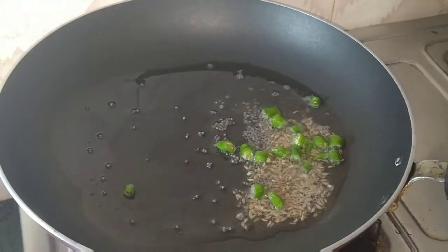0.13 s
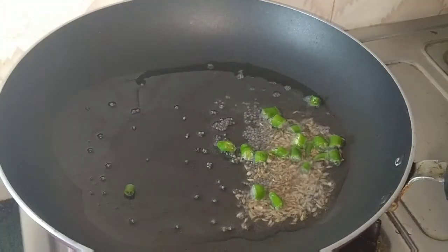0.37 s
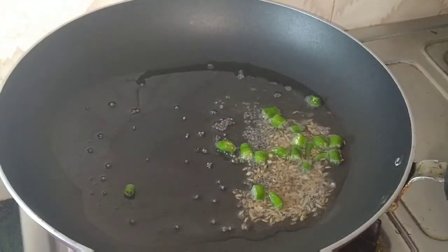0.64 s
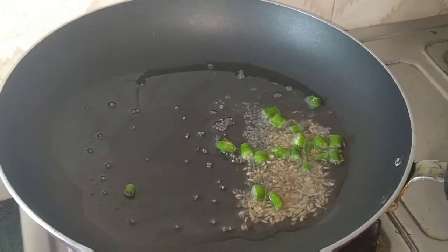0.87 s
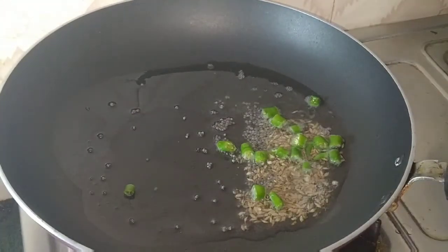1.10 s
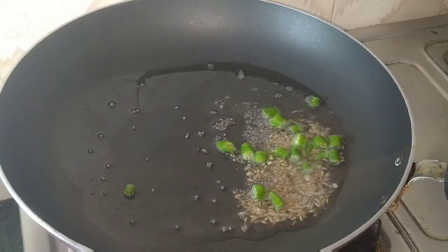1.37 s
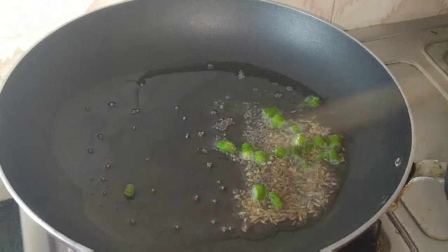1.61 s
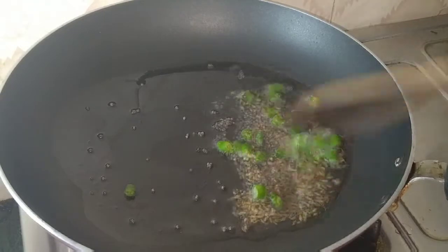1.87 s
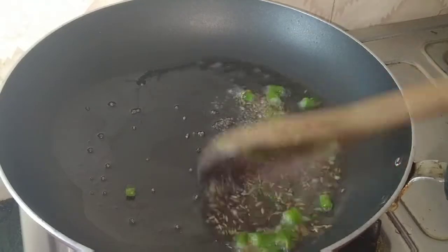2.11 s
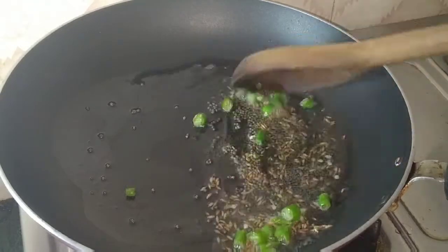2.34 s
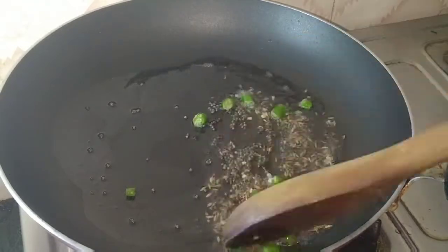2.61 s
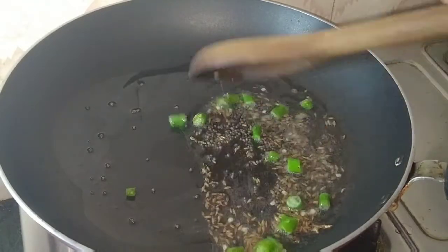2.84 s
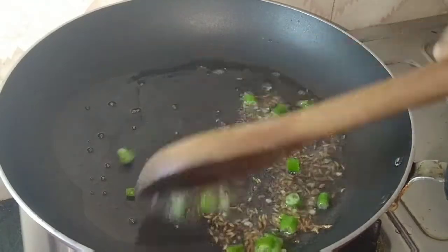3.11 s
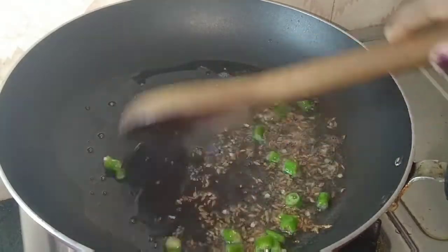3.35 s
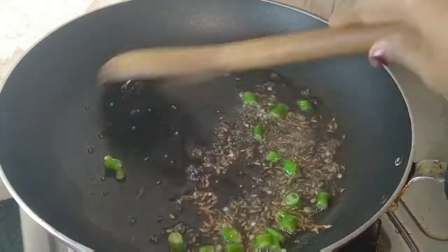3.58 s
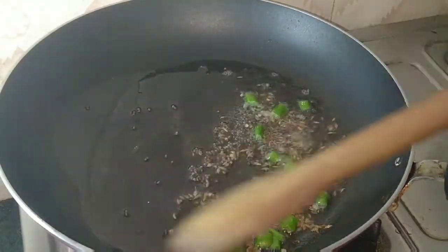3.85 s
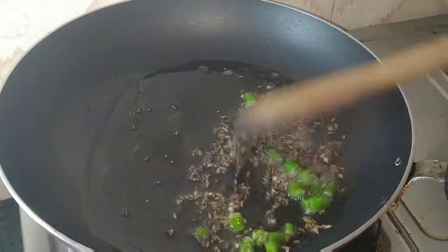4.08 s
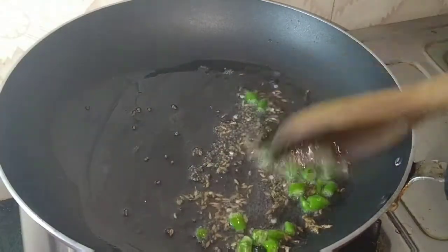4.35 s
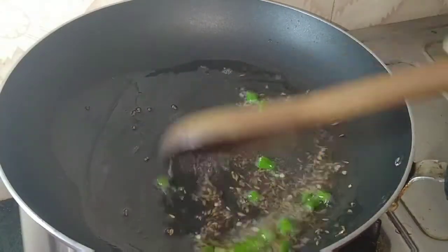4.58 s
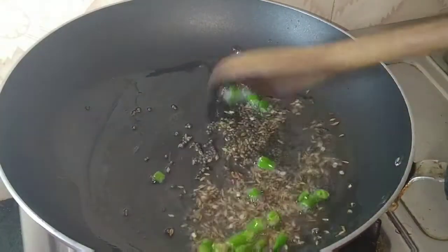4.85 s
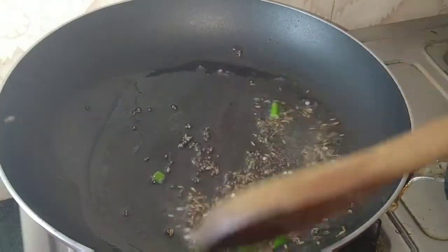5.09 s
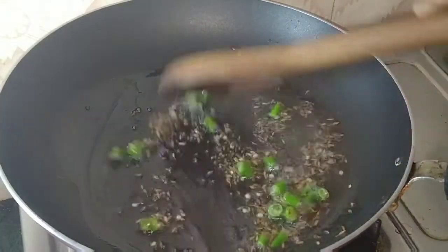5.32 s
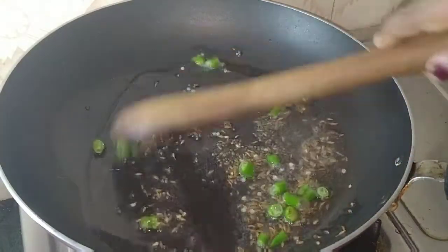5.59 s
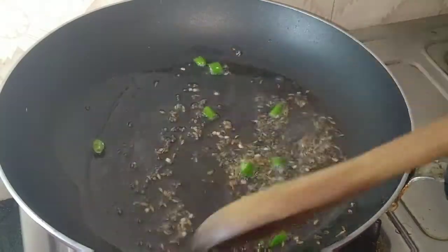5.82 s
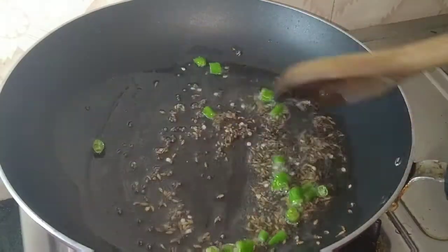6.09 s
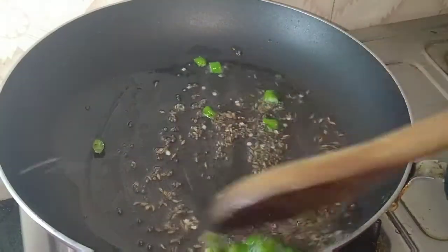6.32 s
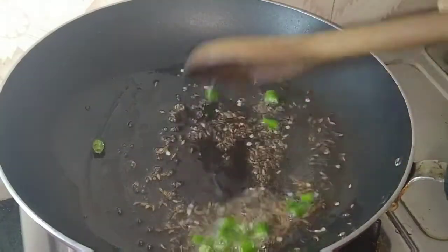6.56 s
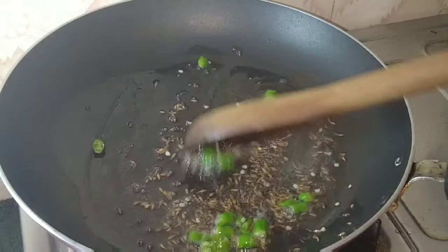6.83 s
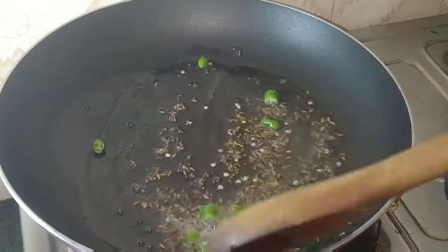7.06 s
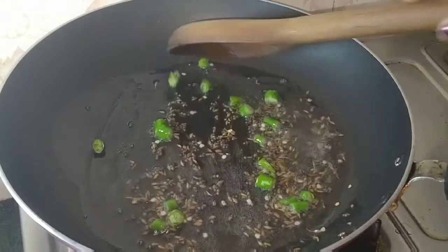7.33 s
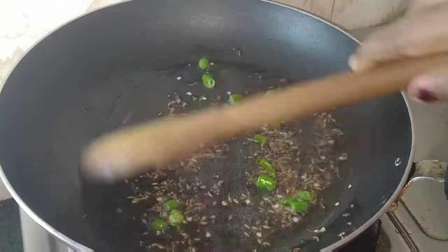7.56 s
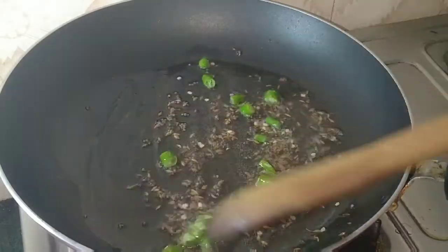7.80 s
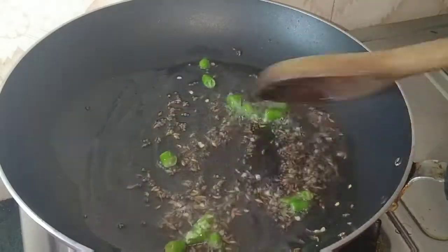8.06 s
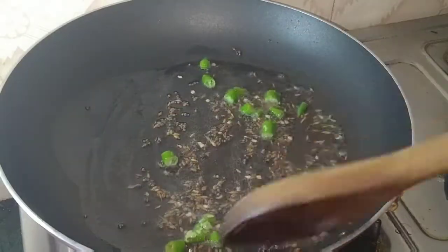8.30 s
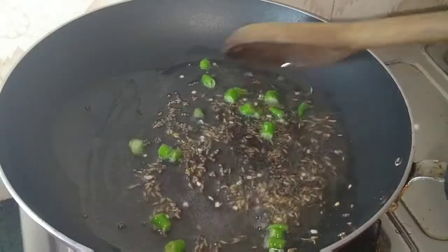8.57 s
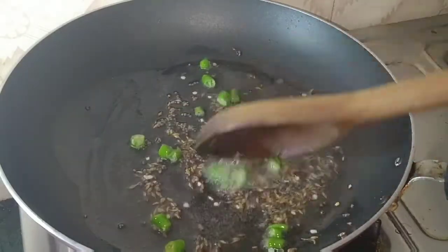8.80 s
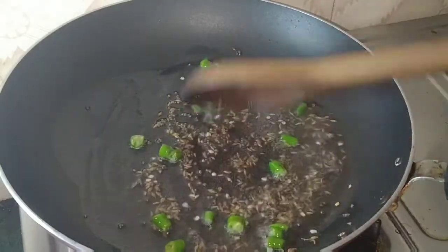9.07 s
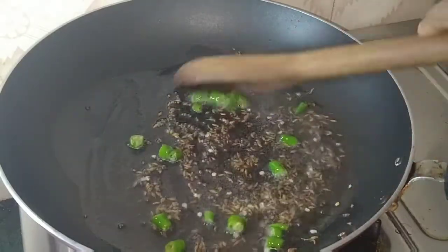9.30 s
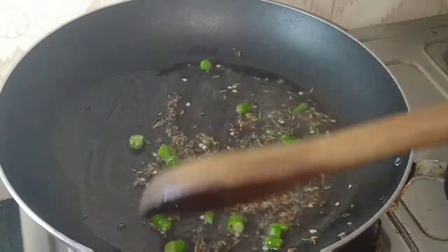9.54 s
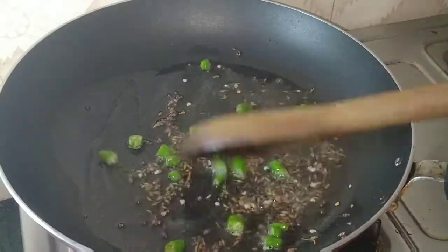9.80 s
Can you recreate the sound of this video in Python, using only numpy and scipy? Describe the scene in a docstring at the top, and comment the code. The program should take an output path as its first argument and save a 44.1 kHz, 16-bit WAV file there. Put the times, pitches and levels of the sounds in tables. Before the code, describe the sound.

A fine, bright sizzle of seeds and chopped chillies in oil, peppered with sharp pops. Early on a dish clatters and something rattles hard, with a tiny dropout. Then a wooden spatula knocks and drags round the metal pan about two or three times a second, while the frying swells and later thins. Close, narrow-band microphone in a small hard-walled kitchen, faint hum beneath.

```python
"""Frying seeds and chillies

Seeds and chillies fry in a shallow metal pan: noise and short sine grains make the fizz, clicks the bursts.
A wooden spatula knocks (noise thud plus ringing sines) and drags (gritty noise); a dish clatters, small
things clink and something rattles hard. Two puffs of air thump the close, narrow-band microphone.
A small hard-walled kitchen answers blows and bursts with fading noise, over a hum of shaped noise.
The sound drops out once for a moment, treble first."""
import sys
import numpy as np
from scipy import signal
from scipy.fft import rfft, irfft, next_fast_len
from scipy.io import wavfile
from scipy.ndimage import uniform_filter1d, map_coordinates

SR = 44100
rng = np.random.default_rng(int(sys.argv[2]) if len(sys.argv) > 2 else 0)


def unload_audio(sound):
    """Save the sound as a 16-bit wav file, at the path given as the first command line argument."""
    columns = np.transpose(np.atleast_2d(sound))
    # keep every value between -1 and 1, then stretch to whole-number steps
    steps = np.round(np.clip(columns, -1, 1) * 32767)
    wavfile.write(sys.argv[1], SR, steps.astype(np.int16))


def invert_db(x):
    """Field ratio 10**(x/20) for x, a level in decibels (scalar or array-like)."""
    u = np.asarray(x, float) / 20
    return 10 ** u


N = 437472  # length in samples

# strength of the frying: (t/s, level/dB)
FRYING = [(0.0, -52), (0.22, -47.5), (0.4, -55), (1.0, -54), (1.75, -55), (1.85, -46.5), (2.05, -47.5),
          (2.76, -42.5), (3.1, -40.5), (3.48, -44.5), (3.89, -47.5), (4.05, -45), (4.85, -46.5),
          (5.14, -41), (6.1, -46), (7.0, -46.5), (7.93, -48), (8.9, -51), (9.1, -51), (9.53, -52),
          (9.7, -52), (9.92, -57.5)]
# colour of the hiss: (f/Hz, relative level per Hz/dB)
HISS_COLOUR = [(900, -46), (1500, -21), (2200, -6), (3100, -9), (4800, 2), (6200, 1.5), (8000, -7)]
# bursts and sharp snaps at set times, loud and soft: (t/s, level/dB, centre f/Hz, jolt to the pan before an offset/dB)
SET_BURSTS = [(0.1244, -23.5, 5150, -66), (0.19, -38, 5160, 0.5), (0.3265, -28, 2600, -5),
              (0.4476, -27.5, 5180, -14), (0.4642, -10, 3560, -9.5), (0.537, -35, 3570, 5),
              (0.7951, -25, 2930, -30), (0.8622, -29, 4100, -0.5), (0.9676, -34.5, 2600, -13),
              (1.207, -24.5, 5230, -14), (1.2469, -35, 2240, -0.5), (1.4696, -11.5, 4870, -19.5),
              (1.6233, -39.5, 5420, -29), (1.9033, -27.5, 3300, -24), (1.9975, -26, 5500, -12.5),
              (2.026, -26, 6100, -39), (2.0906, -24.5, 3800, -24), (2.113, -22.5, 3800, -12),
              (2.423, -27.5, 5400, -9.5), (2.4765, -25.5, 4530, -33.5), (2.792, -13.5, 3970, -3.5),
              (3.0079, -23, 3440, -10), (3.0834, -29.5, 4370, -19.5), (3.3021, -26.5, 4100, -13.5),
              (3.3357, -24, 4550, -9.5), (3.487, -21.5, 5390, -43), (3.5627, -19.5, 4940, -35),
              (3.647, -23.5, 4500, -27), (3.8879, -6.5, 3400, -36.5), (3.9549, -21, 4930, -3),
              (4.3592, -27.5, 4600, -18), (4.4094, -21.5, 6000, -21), (4.481, -25, 4800, -25),
              (4.559, -25, 3380, -13.5), (4.6034, -10.5, 3230, -12.5), (4.6368, -20, 3280, -14),
              (4.8576, -22.5, 3180, -26), (4.9805, -23.5, 4550, -20), (5.0078, -19, 4380, -58),
              (5.2147, -27.5, 4540, -1.5), (5.239, -33.5, 2940, 9.5), (5.269, -23.5, 2600, -3.5),
              (5.317, -19.5, 3730, -24), (5.4787, -31.5, 2500, 4.5), (5.55, -24, 4200, -7),
              (5.5942, -27.5, 3950, -28), (6.0239, -3, 3210, -4), (6.182, -21.5, 5000, -16),
              (6.4269, -4, 4910, -11), (6.4487, -29, 3520, -20), (6.4816, -17.5, 2900, -29),
              (6.508, -26.5, 2430, -11), (6.7459, -22, 3720, -32), (6.8755, -30, 5220, -30.5),
              (7.0562, -17.5, 4390, -11.5), (7.0984, -10, 5020, -15), (7.3857, -28.5, 5300, -4),
              (7.45, -25.5, 4680, -11.5), (7.744, -17.5, 4620, 5.5), (7.8589, -23.5, 3420, -6),
              (7.9537, -38, 4630, 0.5), (8.0138, -30, 4700, -20), (8.136, -28, 4550, -12),
              (8.243, -31.5, 5400, -45), (8.3843, -30, 5270, -23), (8.506, -38, 5600, -12),
              (8.5149, -25.5, 4140, -12), (8.5216, -13, 4700, -9), (8.6026, -28.5, 5020, -22),
              (8.756, -0.5, 5340, -10), (8.7718, -14, 4260, -14.5), (8.7953, -19, 4600, -19),
              (8.8152, -22.5, 5470, -27), (9.0179, -26, 5430, -7.5), (9.032, -22, 5270, -6.5),
              (9.057, -19, 3100, -1.5), (9.2385, -8, 4470, -10), (9.4536, -27.5, 4830, -11.5),
              (9.6544, -24, 5300, -21.5), (9.7965, -28.5, 5500, -44), (9.862, -25, 3780, -11)]
# seeds pushed across the pan: (middle t/s, half length/s, level/dB, centre f/Hz)
SEED_SKIDS = [(0.877, 0.024, -40.5, 4050), (2.103, 0.013, -48.5, 3780), (3.021, 0.016, -35.5, 3680),
              (4.621, 0.022, -35, 3520), (5.005, 0.024, -40, 4500), (6.401, 0.026, -35, 4990),
              (7.064, 0.014, -41, 4330), (7.114, 0.024, -35.5, 4650), (8.537, 0.022, -39.5, 4500),
              (9.272, 0.028, -36, 4800), (9.784, .015, -41, 4300), (9.89, .018, -42.5, 3700)]
# the pan's ringing modes: (f/Hz, relative level/dB, undamped t60/s)
PAN_MODES = [(123.5, 2.5, 0.35), (215.4, 1, 0.79), (278.3, 3.5, 0.4), (393.4, -7.5, 0.61),
             (488, -3.5, 0.42), (554.2, 6, 0.34), (660, -34.5, 0.096), (740, -21, 0.28), (915, -16, 0.4),
             (965, 3, 0.2), (1080, -18.5, 0.1), (1178, 2, 0.16), (1344, -6, 0.41), (1590, 8.5, 0.16),
             (1948, -10, 0.29), (1985, -18, 0.27), (2240, -18, 0.34), (2410, 5.5, 0.045),
             (2730, -37.5, 0.04), (3400, -14, 0.13), (3950, -25, 0.037)]
# the spatula's thud: (f/Hz, width/Hz, relative level/dB)
WOOD_MODES = [(287, 33, 0), (510, 150, -9), (950, 117, -2), (1366, 190, -10.5), (1590, 69, 0),
              (2250, 890, -9)]
# spatula on the pan: (t/s, level/dB, bass before an offset/dB, treble before an offset/dB, relative damping)
SPATULA_KNOCKS = [(0.794, -39.5, -32, 6.5, 0.91), (1.78, -19.5, -17, -13.5, 0.87),
                  (2.096, -34.5, 28, -34, 0.8), (3.009, -47.5, 1, 8, 2.04), (3.243, -5, -24.5, -11, 0.8),
                  (3.854, -12.5, -19.5, -16.5, 1.06), (4.547, -24.5, -14, -20, 1.9),
                  (4.602, -21, -13, -1.5, 0.83), (4.86, -34.5, -14.5, -5.5, 1.3),
                  (5.119, -10.5, -23.5, -15.5, 1.04), (5.456, -24.5, -12.5, -50, 0.9),
                  (5.793, -15.5, -21.5, -15, 0.97), (6.113, -36.5, 5.5, -11, 1.6),
                  (6.219, -27.5, -19.5, -6, 1.1), (6.387, -32.5, -2, 13.5, 0.61),
                  (6.447, -42.5, 6, -2.5, 1.1), (6.956, -9.5, -23.5, -21, 0.82),
                  (7.349, -19.5, -14.5, -19, 1.1), (7.7, -10, -19, -12, 0.62), (7.856, -17.5, -23, 2, 1.1),
                  (8.165, -22, -11.5, -14.5, 0.93), (8.687, -29.5, -13, 6.5, 0.62),
                  (8.938, -7, -22.5, -10.5, 1.5), (9.531, -38.5, -31, 15.5, 0.78),
                  (9.562, -9, -26.5, -13, 0.91)]
# spatula resting and pushing on the pan floor: (t/s, rubbing level/dB)
SPATULA_DRAG = [(0.0, -61.5), (0.7, -65), (1.1, -65), (1.9, -67), (2.2, -57), (2.96, -61.5), (3.09, -54.5),
                (3.23, -67), (3.62, -53), (3.85, -59.5), (4.4, -57.5), (5.4, -66), (6.05, -57), (6.3, -70),
                (6.74, -52.5), (6.93, -66), (8.5, -62), (9.5, -68.5), (9.92, -59.5)]
# a dish near the stove: (f/Hz, relative level/dB, undamped t60/s)
DISH_MODES = [(386, -10, 0.39), (447, -6.5, 0.25), (530, -18, 0.32), (665, -7.5, 0.17), (724, 8, 0.04),
              (826, -11.5, 0.49), (1150, -31, 0.34), (1900, -11.5, 0.4), (2425, -16.5, 0.25),
              (2880, -10.5, 0.18), (3740, -18, 0.14)]
# the dish's contacts: (t/s, level/dB, treble/dB, ring/dB, damping factor)
DISH_CONTACTS = [(0.464, -17.5, -1.5, 2.5, 1.05), (0.61, -30.5, -0.5, 6.5, 1.8), (.86, -35, 19, 6, 2.1)]
# small things that ring at one pitch: (t/s, f/Hz, level/dB, t60/s, attack time constant/s)
SMALL_CLINKS = [(.885, 530, -42.5, 0.25, 0.0037), (1.09, 740, -58, 0.19, .005),
                (1.2467, 2266, -21, 0.02, 0.00052), (6.735, 560.6, -37.5, 0.28, 0.0035),
                (7.031, 1590, -36, 0.1, 0.0046)]
# a rattling clang: (t/s, bright level/dB, low level/dB)
CLANG_LEVELS = [(1.4675, -16.5, -43), (1.485, -21.5, -23.5), (1.495, -24, -36), (1.511, -24.5, -27),
                (1.533, -36, -34)]
# resonances of the bright part of the clang, applied twice: (f/Hz, width/Hz, level/dB)
RATTLE_MODES = [(1450, 270, -2), (2260, 470, -3), (2940, 270, 1.5), (4100, 350, 2), (4800, 600, 2.5),
                (6160, 2700, -5)]
# puffs on the microphone: (t/s, level before the kick's shape/dB, start f/Hz, t60/s, dip of other sound/dB)
AIR_PUFFS = [(2.7951, -2, 754, 0.069, -2.5), (5.2411, 0, 550, 0.032, -20.5)]
# how long the kitchen rings on: (f/Hz, t60/s)
KITCHEN_DECAY = [(150, 0.33), (500, 0.31), (1200, 0.17), (3000, 0.13), (6500, 0.21)]
# hum of the stove and kitchen: (f/Hz, relative level per Hz/dB)
HUM_COLOUR = [(24, -31), (40, -12.5), (262, 4.5), (539, -5.5), (658, -9.5), (927, -2.5), (1430, -17.5),
              (1570, -19), (3000, -6.5), (3900, -24), (6600, -120)]
# the sound drops out for a moment, treble first: (t/s, treble level/dB, bass level/dB)
DROPOUT_LEVELS = [(1.511, 0, 0), (1.5125, -16, -1), (1.526, -20, -8), (1.533, -40, -30), (1.543, -40, -30),
                  (1.548, 0, 0)]
# microphone response apart from its bass cut: (f/Hz, level/dB)
MIC_RESPONSE = [(100, -4), (6000, -2), (6600, -11.5), (7000, -23), (7500, -25.5), (7900, -29), (9000, -62),
                (22050, -70)]


def unit(x):
    """Scale to rms 1."""
    return x / np.sqrt(np.mean(x ** 2) + 1e-20)


def peak(x):
    """Scale to peak 1."""
    return x / np.abs(x).max()


def along(points, hz):
    """Read a curve of (f/Hz, value) points on a log frequency axis."""
    f, value = np.transpose(points)
    return np.interp(np.log(hz + 1), np.log(f + 1), value)


def curves(rows):
    """One value per sample for each column after the time."""
    s, *columns = np.transpose(rows)
    return [np.interp(np.arange(N) / SR, s, column) for column in columns]


def wobble(rate):
    """A smooth random curve, with rate knots a second."""
    knots = rng.standard_normal(int(N * rate / SR) + 4)
    return map_coordinates(knots, [np.arange(N) * rate / SR])


def filtered(x, response):
    """Multiply the spectrum of x by a response of frequency."""
    m = next_fast_len(len(x) + 8192)  # spare room for the ringing
    return irfft(rfft(x, m) * response(np.fft.rfftfreq(m, 1 / SR)), m)[:len(x)]


def resonances(modes):
    """Sum (f/Hz, width/Hz, level/dB) resonances, with signs alternating."""
    def response(f):
        total = 0
        for k, (centre, width, db) in enumerate(modes):
            total = total + (-1) ** k * invert_db(db) * 1j * f * width / (centre ** 2 - f * f + 1j * f * width)
        return total
    return response


def add(track, s, sound):
    """Mix a sound in at time s."""
    track[round(s * SR):][:len(sound)] += sound


def fizz():
    """Steam bubbles burst in the oil: short grains in clumps over a patchy hiss."""
    count = 16000
    luck = rng.random((count, 4))
    crowd = np.cumsum(invert_db(4 * wobble(20) + 4 * wobble(90)))  # bubbles come in clusters
    start = np.searchsorted(crowd, luck[:, 0] * crowd[-1])[:, None]
    hz = 4800 * np.exp(0.22 * rng.standard_normal((count, 1)))
    k = np.arange(160)  # samples in a grain
    cycles = k * hz / SR
    life = 1.3 + 6 * luck[:, 1:2]
    size = invert_db(-3.5 * np.log(luck[:, 2:3] + 0.0014))  # many small, few large
    grain = size * cycles * np.exp(-cycles / life * 2) / life * np.sin(2 * np.pi * cycles)
    grains = np.bincount((start + k).ravel(), grain.ravel(), N + len(k))[:N]

    z = signal.stft(rng.standard_normal(N), nperseg=256)[2]
    patches = uniform_filter1d(rng.standard_normal(z.shape), size=5, axis=0)
    patches = uniform_filter1d(patches, size=6, axis=1)
    hiss = signal.istft(z * invert_db(2 * unit(patches)), nperseg=256)[1][:N]
    hiss = unit(filtered(hiss, lambda f: invert_db(along(HISS_COLOUR, f))))
    return invert_db(curves(FRYING)[0]) * (invert_db(-3.0) * unit(grains) + invert_db(-3.5 + 0.45 * wobble(30)) * hiss)


def crackle():
    """Tiny one-sample spits, broad in pitch, following the frying."""
    luck = rng.random((1500, 2))
    size = invert_db(-5 * np.log(luck[:, 1] + 0.032))
    spits = np.bincount((luck[:, 0] * N).astype(int), size, N)
    spits = unit(filtered(spits, resonances([(2600, 3500, 0)])))
    return invert_db(curves(FRYING)[0] - 13.5) * spits


def random_bursts(count):
    """Rows like SET_BURSTS at random moments, mostly louder where the frying is stronger."""
    luck = rng.random((count, 4))
    when, fizz_db = np.transpose(FRYING)
    s = luck[:, 0] * N / SR
    loudest_db = np.minimum(np.interp(s, when, fizz_db) + 13.5, -26)
    db = loudest_db - 17 * luck[:, 1]
    hz = 4500 * np.exp(1.2 * (luck[:, 2] - 0.5))
    jolt_db = -27.5 + 16 * (luck[:, 3] - 0.5)
    return list(zip(s, db, hz, jolt_db))


def snaps():
    """A burst is a sharp click around its own pitch; it jolts the pan and throws a spray of oil."""
    clicks, sprays, t = np.zeros(N + SR), np.zeros(N + SR), np.arange(SR // 8) / SR
    upper_modes = [(hz, 12 / t60, db - 6.5) for hz, db, t60 in PAN_MODES if hz > 800]
    pan = resonances([(1300, 3000, -2.3)] + upper_modes)
    # the spatula's edge also ticks at each knock, more on bright ones
    ticks = [(s + 0.0005, db - 6 + 1.08 * treble_db, 2310, -1.5)
             for s, db, _, treble_db, _ in SPATULA_KNOCKS]
    for s, db, hz, jolt_db in SET_BURSTS + ticks + random_bursts(count=58):
        click = 0.6 * rng.standard_normal(len(t)) * invert_db(-60 * t / 0.01)
        click[0] += 2.5
        spray_db = -13 - 0.1769 * (db + 24.5)  # a smaller share for big dry cracks
        spray_shape = invert_db(-60 * t / 0.074) * (1 - np.exp(-t / 0.0024))
        spray = invert_db(spray_db) * rng.standard_normal(len(t)) * spray_shape
        crack_db = -10.5 + 0.29 * (db + 18)  # big bursts crack over the whole band
        top = resonances([(hz, hz / 6.44, 0), (3600, 5000, crack_db)])
        top_peak = np.abs(filtered(click, top)).max()
        pan_peak = np.abs(filtered(click, pan)).max()
        colour = lambda f: top(f) / top_peak + invert_db(jolt_db + 7.5) * pan(f) / pan_peak
        add(clicks, s, invert_db(db) * filtered(click, colour))
        add(sprays, s, invert_db(db) * filtered(spray, colour))
    return clicks[:N], sprays[:N]


def rustles():
    """A heap of seeds skids: grainy noise that swells and fades around one pitch."""
    out, t = np.zeros(N + SR), np.arange(SR // 4) / SR - 1 / 8
    for s, half, db, hz in SEED_SKIDS:
        grit = rng.standard_normal(len(t)) * invert_db(4.5 * wobble(500)[:len(t)])
        skid = unit(filtered(grit, resonances([(hz, hz / 3, 0)])))
        add(out, s - 1 / 8, invert_db(db) * np.exp(-(t / half) ** 2) * skid)
    return out[:N]


def struck(modes, tilt_db, ring_db, damping):
    """One blow: a dry wooden thud and its chatter, with the modes ringing unevenly under it."""
    t = np.arange(SR // 2) / SR
    hz, db, t60 = np.transpose(modes)[:, :, None]
    scatter_db = 2.5 * rng.standard_normal((len(modes), 1))
    knots = np.minimum(rng.standard_normal((len(modes), 32)), 0.7)  # 62 knots a second
    flutter_db = 8.9 * np.array([np.interp(t * 62, np.arange(len(k)), k) for k in knots])
    # the ring's level flutters at random, more as it fades
    flutter_db = flutter_db * np.minimum(t / 0.049, 1)
    ring_levels = invert_db(db + tilt_db(hz) + scatter_db + flutter_db - 60 * t * damping / t60)
    ring = (ring_levels * np.sin(2 * np.pi * hz * t)).sum(0)
    ring = ring * (1 + 0.86 * np.exp(-t / 0.033))  # stronger at first
    # a short noisy thud, then a weaker noisy tail
    chatter_level = 1.12 * invert_db(-60 * t / 0.023) + 0.27 * invert_db(-60 * t * damping / 0.36)
    chatter = rng.standard_normal(len(t)) * chatter_level
    chatter[:12] += 1.5  # the contact itself, a quarter millisecond
    wood = resonances([(hz, width, db + tilt_db(hz)) for hz, width, db in WOOD_MODES])
    blow = peak(filtered(chatter, wood)) + invert_db(ring_db) * peak(ring)
    blow = filtered(blow, lambda f: 1j * f / (90 + 1j * f))  # small things give off little deep bass
    return np.pad(blow, (SR // 1000, 0))  # the blow starts a millisecond after its listed time


def knocks():
    """The spatula strikes the pan; where it lands tilts the colour and the hand damps it."""
    out = np.zeros(N + SR)
    for s, db, bass_db, treble_db, damping in SPATULA_KNOCKS:
        tilt = lambda f: along([(300, bass_db + 16.0), (900, 0.0065), (2000, treble_db + 7)], f)
        ring_db = -12.5 - 0.4836 * db  # harder blows are more wood than metal
        add(out, s, invert_db(db) * struck(PAN_MODES, tilt, ring_db, max(damping, 0.2) * 1.39))
    return out[:N]


def drag():
    """Wood and seeds rub the pan floor: gritty noise in the pan's modes; a slide follows each knock."""
    grit = rng.standard_normal(N) * invert_db(1.5 * wobble(45) + 3.8 * wobble(200))
    modes = [(hz, 9 / t60, db) for hz, db, t60 in PAN_MODES]  # shorter rings are wider
    metal_rub = unit(filtered(grit, resonances(modes)))
    broad_rub = unit(filtered(grit, resonances([(1230, 1500, 0)])))
    rub = metal_rub + 0.35 * broad_rub
    slides, t = np.zeros(N + SR), np.arange(SR // 2) / SR
    delay_s, half_s = 0.061, 0.055
    for s, db, *_ in SPATULA_KNOCKS:
        slide_db = -60 + 0.26 * (db + 18)  # harder knocks slide louder
        add(slides, s, invert_db(slide_db) * np.exp(-((t - delay_s) / half_s) ** 2))
    pushing = invert_db(curves(SPATULA_DRAG)[0] + 2.5 * wobble(6))
    return (slides[:N] + pushing) * unit(rub)


def kitchenware():
    """A dish clatters and small things clink: struck modes and single fading tones."""
    out, t = np.zeros(N + SR), np.arange(SR // 2) / SR
    for s, db, treble_db, ring_db, damping in DISH_CONTACTS:
        tilt = lambda f: along([(800, 0.0066), (2500, treble_db)], f)
        add(out, s, invert_db(db) * struck(DISH_MODES, tilt, ring_db, max(damping, 0.2)))
    for s, hz, db, t60, attack in SMALL_CLINKS:
        unsteady_db = 4.5 * wobble(60)[:len(t)] * np.minimum(t / 0.03, 1)
        level = invert_db(db + unsteady_db - 60 * t / t60) * (1 - np.exp(-t / max(attack, 1e-4)))
        add(out, s, level * np.sin(2 * np.pi * hz * t))
    return out[:N]


def rattling_clang():
    """Something rattles hard: jolting noise in bright resonances, steadier noise in low ones."""
    bright_db, low_db = curves(CLANG_LEVELS)
    sample = np.arange(N)
    sounding = (sample > CLANG_LEVELS[0][0] * SR) & (sample < CLANG_LEVELS[-1][0] * SR)
    jolts = rng.standard_normal(N) * invert_db(3.5 * wobble(250))
    bright = unit(filtered(jolts, lambda f: resonances(RATTLE_MODES)(f) ** 2))
    low_modes = resonances([(418, 120, 15.0), (784, 1200, -12.5)])
    low = unit(filtered(rng.standard_normal(N), low_modes))
    return sounding * (invert_db(bright_db) * bright + invert_db(low_db) * low)


def puffs():
    """Air pushes the diaphragm: a kick slides down to a slow swing; other sound dips under it."""
    out, dip_db, t = np.zeros(N + SR), np.zeros(N + SR), np.arange(SR // 10) / SR
    swing_hz = 98
    for s, db, start_hz, t60, depth_db in AIR_PUFFS:
        hz = swing_hz + (start_hz - swing_hz) * np.exp(-t / 0.0011)
        turns = np.cumsum(hz) / SR
        kick = 0.31 + 1.13 * np.exp(-t / 0.0004)
        add(out, s, invert_db(db - 60 * t / t60) * kick * np.sin(2 * np.pi * turns))
        add(dip_db, s + 0.002, depth_db * np.exp(-(t / 0.014) ** 4))
    return out[:N], invert_db(dip_db[:N])


def kitchen(x):
    """The walls answer with noise, each frequency dying at its own speed, new every quarter second."""
    out, step = np.zeros(N + 2 * SR), SR // 4
    for start in range(0, N, step):
        hz, t, z = signal.stft(rng.standard_normal(SR // 2), SR, nperseg=256)
        fade = invert_db(-60 * t / along(KITCHEN_DECAY, hz)[:, None])
        tail = signal.istft(z * fade, SR, nperseg=256)[1]
        answer = signal.fftconvolve(x[start:start + step], tail / np.linalg.norm(tail))
        add(out, start / SR + 0.005, answer)
    return out[:N]


def stove_hum():
    """The stove and kitchen hum: coloured noise with an unsteady level."""
    noise = filtered(rng.standard_normal(N), lambda f: invert_db(along(HUM_COLOUR, f)))
    return invert_db(-68.5 + 1.5 * wobble(9) + 5.7 * wobble(47)) * unit(noise)


def scene():
    """Pan, oil and kitchenware in the room, over the stove's hum, with puffs at the microphone."""
    clicks, sprays = snaps()
    oil = fizz() + crackle() + rustles() + clicks + sprays
    blows = knocks() + kitchenware()
    room = kitchen(invert_db(-3) * blows + invert_db(-23) * clicks + invert_db(-0.5) * sprays)
    puff, dip = puffs()
    mix = oil + blows + drag() + rattling_clang() + room + stove_hum()
    return (dip * mix + puff)[None]


def band_limit(x):
    """A steep low-pass at the top of the band."""
    return signal.sosfilt(signal.butter(12, 7600, fs=SR, output="sos"), x)


def record(dry):
    """A short dropout, then a microphone that cuts bass and treble."""
    treble_db, bass_db = curves(DROPOUT_LEVELS)
    bass = filtered(dry[0], lambda f: 1 / (1 + (f / 1500) ** 6))
    treble = dry[0] - bass
    with_dropout = invert_db(bass_db) * bass + invert_db(treble_db) * treble
    bass_cut = lambda f: (-f * f / (95 ** 2 - f * f + 1j * f * 130)) ** 2
    heard = filtered(with_dropout, lambda f: invert_db(along(MIC_RESPONSE, f)) * bass_cut(f))
    return band_limit(heard[None])


dry = scene()
out = record(dry)
unload_audio(out)
```